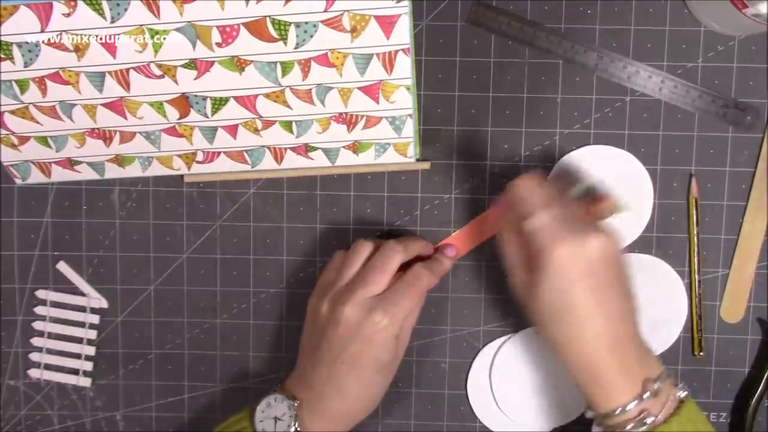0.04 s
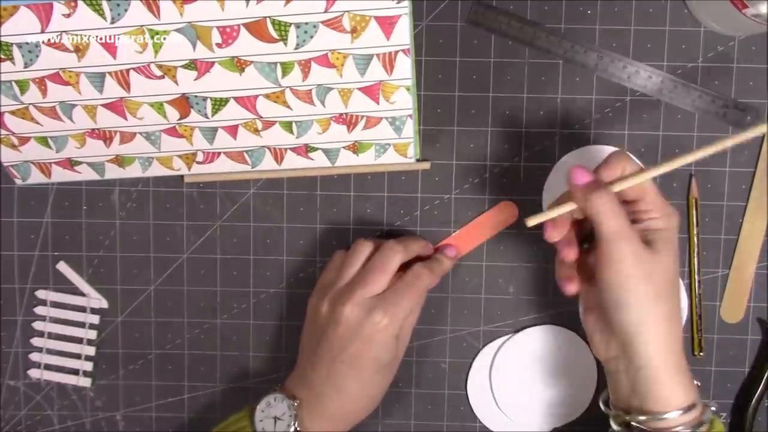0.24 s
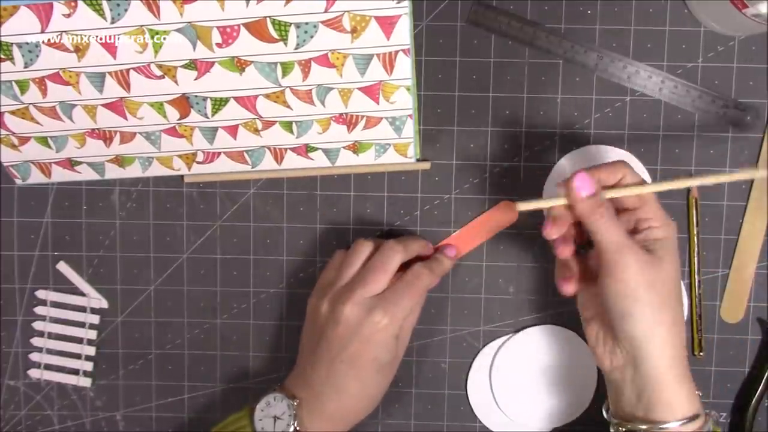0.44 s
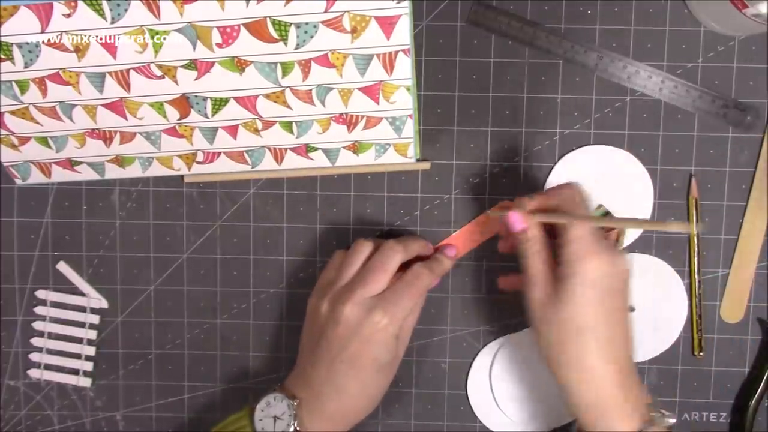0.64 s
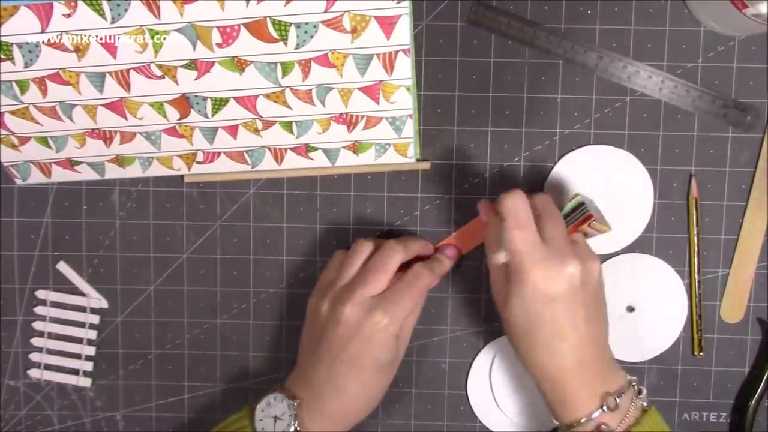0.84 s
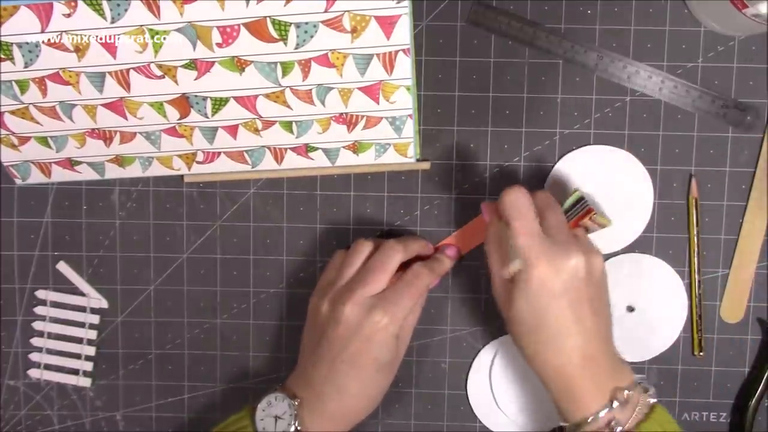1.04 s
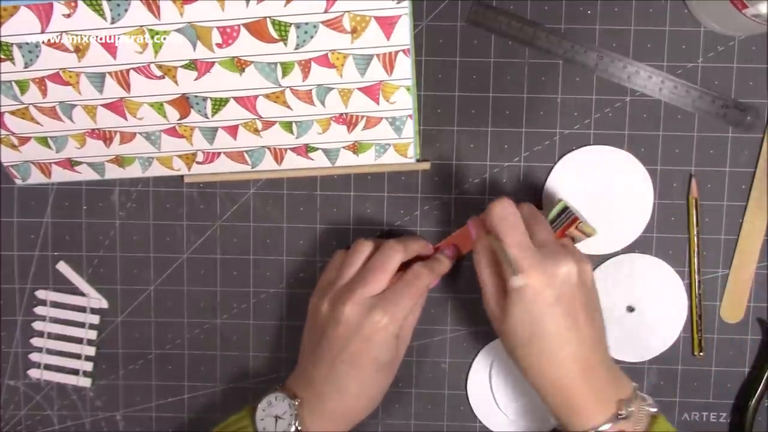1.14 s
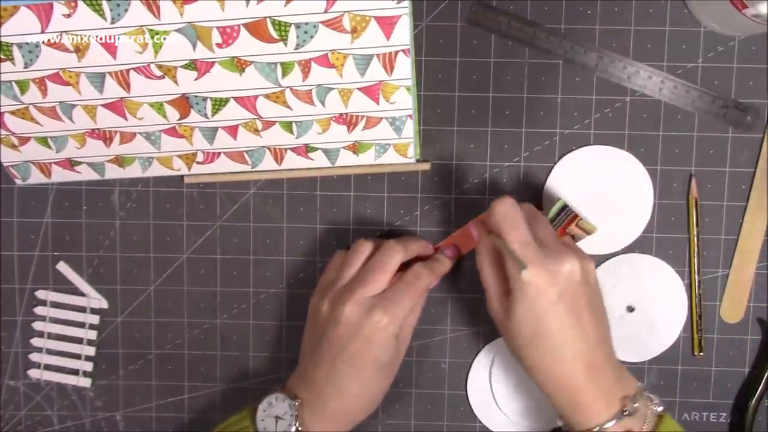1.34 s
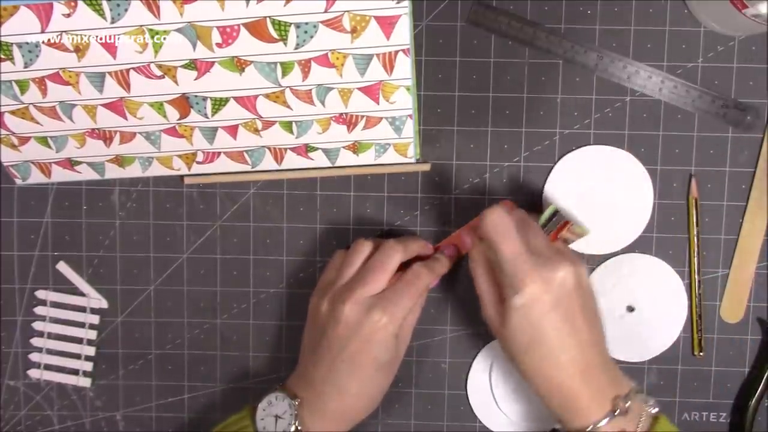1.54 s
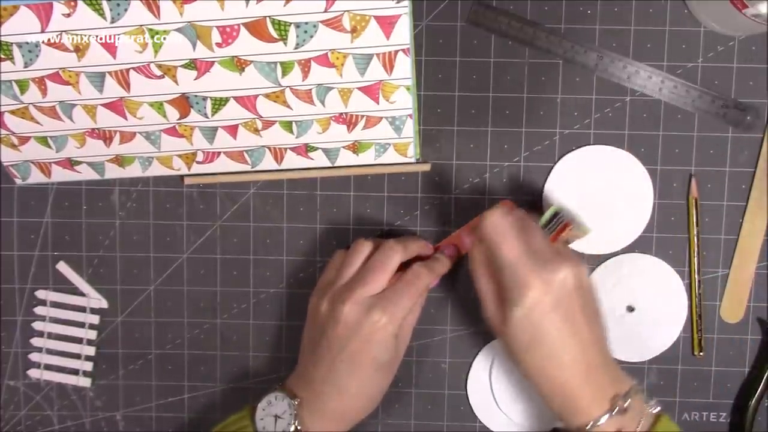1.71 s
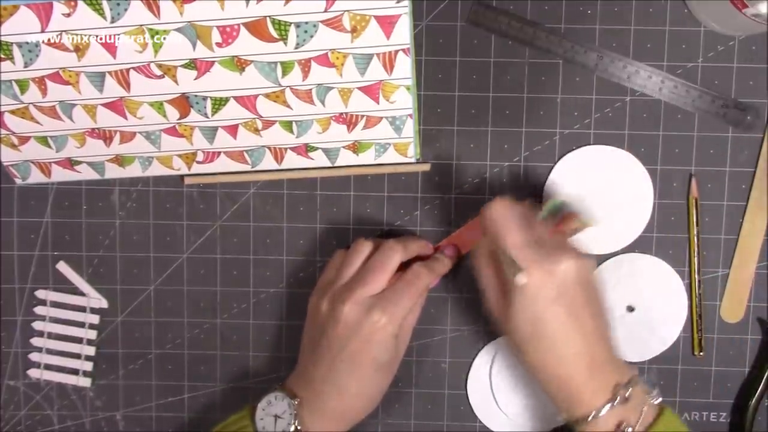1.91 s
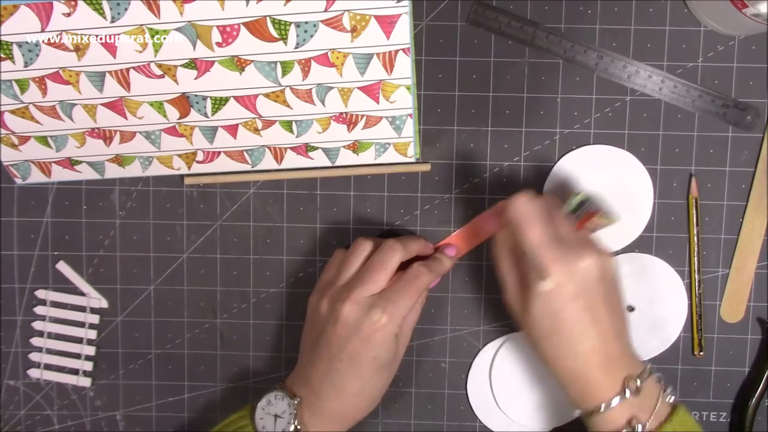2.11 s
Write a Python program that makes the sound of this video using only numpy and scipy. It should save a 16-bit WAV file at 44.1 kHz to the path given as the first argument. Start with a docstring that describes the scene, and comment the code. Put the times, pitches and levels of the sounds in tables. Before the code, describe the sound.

A nail file rasps on the end of a wooden dowel, heard close in a small room. A stroke ends with a woody tap at 0 s, and a bracelet clinks at 0.1. Faint finger brushes fill the pause until a soft knock near 0.66. Short hesitant scrapes follow, then from 1.0 steady gritty strokes, about eleven a second, alternate hollow and duller, growing stronger, with bright bangle clinks over quiet room noise.

```python
"""Filing the end of a wooden dowel

A nail file rasps across the cut end of a dowel, about eleven strokes a second, close by in a small room.
Noise grains of grit hiss and ring file and dowel: pushes ring hollow, pulls are duller and rub more in the hands.
In one pause the fingers brush the dowel as they turn it and set it back on the file with a knock of struck modes.
Bracelets clink on the working wrist: short bright noise and decaying modes. Behind it all is a quiet noise floor."""
import sys
import numpy as np
from scipy import signal
from scipy.fft import rfft, irfft
from scipy.io import wavfile

SR = 44100
rng = np.random.default_rng(int(sys.argv[2]) if len(sys.argv) > 2 else 0)


def wav_record(signal):
    """Record a signal, one row per channel, as 16-bit PCM in the file named by sys.argv[1]."""
    frames = np.transpose(np.atleast_2d(signal))
    bounded = np.clip(frames, -1, 1)
    # unit amplitude maps onto the largest positive 16-bit level
    quanta = np.round(bounded * 32767).astype(np.int16)
    wavfile.write(sys.argv[1], SR, quanta)


N = 95564
T = np.arange(N) / SR


def amp(db):
    """Decibels to gain."""
    return 10 ** (np.asarray(db) / 20)


def unit(x):
    """Scales to rms 1."""
    return x / np.sqrt(np.mean(x ** 2) + 1e-20)


def read(points, hz):
    """Reads a table on a log-frequency axis."""
    f, value = np.transpose(points)
    return np.interp(np.log(hz + 1), np.log(f + 1), value)


def colour(x, points, size=4096):
    """Causal minimum-phase filter with the given spectrum that keeps the power of white noise."""
    log_gain = np.log(amp(read(points, abs(np.fft.fftfreq(size, 1 / SR)))))
    spectrum = np.exp(np.conj(signal.hilbert(log_gain)))
    taps = np.fft.ifft(spectrum).real[:size // 2]
    return signal.fftconvolve(x, taps / np.linalg.norm(taps))[:N]


def resonate(x, hz, width_hz):
    """A resonance of gain 1 at a fixed or moving pitch: shift to 0 Hz, smooth, shift back."""
    turn = np.exp(2j * np.pi * np.cumsum(hz * np.ones(len(x))) / SR)
    r = np.exp(-np.pi * width_hz / SR)
    smooth = signal.lfilter([1 - r], [1, -r], x / turn + 1e-18)
    return 2 * (turn * smooth).real


def resonate_twice(x, hz, width_hz):
    """Two equal resonances in a row, for steeper skirts."""
    return resonate(resonate(x, hz, width_hz), hz, width_hz)


def add(mix, start_s, sound):
    """Adds a sound to the mix at a time."""
    part = mix[round(start_s * SR):][:len(sound)]
    part += sound[:len(part)]


def ring(hz, t60_s, rise_s):
    """One struck mode: a sine with a soft onset and an exponential decay."""
    t = T[:SR // 5]
    decay = np.exp(-np.log(1000) * t / t60_s)
    return (1 - np.exp(-t / rise_s)) * decay * np.sin(2 * np.pi * (hz * t + rng.random()))


def filing():
    """Strokes drive grit hiss, a rasp, the ring of the wood and a low rub through the hands; the file snags."""
    # strokes of the file, low-ringing pushes and higher-ringing pulls, mostly in turn from 1.1 s on:
    # start_s, length_s, grit_db, wood_ring_db, wood_pitch_hz, low_rub_db
    strokes = [(-.05, 0.065, -35.5, -40.5, 1460, -50.5), (.720, 0.067, -45.5, -40.5, 1290, -55.5),
               (.746, 0.017, -80, -36.5, 1390, -51), (.824, 0.027, -39, -40, 1790, -50.5),
               (.849, 0.024, -48.5, -49.5, 1685, -57), (.929, 0.031, -42, -34, 1390, -50.5),
               (1.009, 0.072, -38.5, -35, 1650, -46), (1.111, 0.055, -38.5, -35, 1370, -49.5),
               (1.213, .052, -33.5, -38.5, 1690, -42.5), (1.303, 0.047, -37, -36.5, 1290, -51),
               (1.397, 0.061, -35.5, -36, 1695, -41.5), (1.489, 0.066, -34.5, -27.5, 1270, -48.5),
               (1.587, 0.068, -36, -41, 1770, -43), (1.675, 0.062, -33.5, -28, 1336, -45.5),
               (1.767, 0.068, -35, -41, 1950, -45), (1.857, 0.062, -33, -29.5, 1480, -45),
               (1.950, 0.054, -33.5, -47, 1890, -40), (2.038, 0.061, -35, -30.5, 1560, -43.5),
               (2.12, 0.056, -35, -39, 1630, -43)]
    # the file snags on a fibre: start_s, wood_ring_db
    snags = [(0.749, -34.5), (1.236, -35.5), (1.43, -31.5), (1.803, -24), (1.895, -41.5)]
    # colour of the grit hiss: frequency_hz, level_db
    grit_colour = [(150, -66.5), (700, -3.5), (1500, 11), (2700, 4), (3300, 0.5), (4500, 1.5), (5200, -2.5),
                   (7000, -2.5), (9500, -4.5), (12000, -10), (13500, -17.5), (15700, -23)]
    # colour of the low rub in the hands: frequency_hz, level_db
    rub_colour = [(30, -82), (100, -17), (140, -8.5), (210, 1.5), (310, 0), (380, -2.5), (520, 4.5),
                  (650, -3), (850, 1), (1300, -20), (4000, -30.5)]
    push_below_hz = 1690  # a push rings lower than a pull
    push_glide, pull_glide = -0.23, 0.18  # octaves in one stroke, as the free length changes
    push_late, pull_late, grit_late, rasp_late = 0.77, 0.99, 0.66, 0.95  # below 1: loudest early, then trails off
    grit_arch, wood_arch, rub_arch = 0.56, 1, 0.15  # how steeply each layer follows the speed of the stroke
    wood_overrun_s, rub_overrun_s = 0.0061, 0.0075  # ring and rub outlast the bite of the grit
    rasp_hz, rasp_width_hz, rasp_db = 2634, 1100, -7  # upper resonance of the file, level against grit and ring
    wood_width_hz = 910
    snag_s, snag_grit_db = 0.0015, -11.5  # time to the peak, grit level against the ring
    catch_s, catch_db = 0.002, 1.8  # smoothing time and rms swing of the uneven bite

    grit, rasp, wood, rub = np.zeros((4, N))
    pitch = np.full(N, float(strokes[0][4]))
    for start, length, grit_db, wood_db, hz, rub_db in strokes:
        glide, late = (push_glide, push_late) if hz < push_below_hz else (pull_glide, pull_late)
        grit += amp(grit_db) * speed(start, length, grit_late) ** grit_arch
        rasp += amp((wood_db + grit_db) / 2 + rasp_db) * speed(start, length, rasp_late) ** grit_arch
        wood += amp(wood_db) * speed(start, length + wood_overrun_s, late) ** wood_arch
        rub += amp(rub_db) * speed(start, length + rub_overrun_s) ** rub_arch
        progress = np.clip((T - start) / length, 0, 1)
        pitch = np.where(T >= start, hz * 2 ** (glide * (progress - .5)), pitch)
    for start, db in snags:
        u = np.maximum(T - start, 0) / snag_s
        jolt = amp(db) * (u * np.exp(1 - u)) ** 2
        wood += jolt
        grit += amp(snag_grit_db) * jolt

    wander = signal.fftconvolve(rng.standard_normal(N), np.exp(-T / catch_s))[:N]
    catch = unit(amp(catch_db * unit(wander)))
    hiss = colour(grit * catch * grains(), grit_colour)
    low_rub = colour(rub * grains(), rub_colour)
    hollow = wood_ring(wood * catch * grains(), pitch, wood_width_hz)
    bright = wood_ring(rasp * catch * grains(), rasp_hz, rasp_width_hz)
    return hiss + low_rub + hollow + bright


def speed(start_s, length_s, late=1):
    """The hand speeds up and slows down in half a sine, leaning late above 1 and early below."""
    arch = np.sin(np.pi * np.clip((T - start_s) / length_s, 0, 1) ** late).clip(0)
    return arch * (T < start_s + length_s)


def grains():
    """Dense tiny clicks of uneven size: grit tearing fibres."""
    per_s, spread_db = 6500, 2.2
    size = amp(spread_db * np.minimum(rng.exponential(1, N), 4))
    return unit(size * rng.choice([-1., 1.], N) * (rng.random(N) < per_s / SR))


def wood_ring(drive, hz, width_hz):
    """A broad resonance feeds the narrow modes of file and dowel, too small to radiate bass."""
    # modes of file and dowel: frequency_hz, width_hz, level_db
    body_modes = [(525, 20, 7), (880, 30, -2), (958, 25, -1), (1107, 26, 10), (1279, 22, 0), (1341, 25, 0),
                  (1615, 50, 1), (1761, 30, 0), (1830, 25, 1), (1925, 35, -2), (2188, 35, -3),
                  (2470, 60, 0), (2590, 30, 3)]
    broad_db, lowest_hz = -3.5, 383
    broad = resonate_twice(drive, hz, width_hz)
    body = amp(broad_db) * broad
    for mode_hz, mode_width_hz, db in body_modes:
        body += amp(db) * resonate(broad, mode_hz, mode_width_hz)
    no_bass = signal.butter(2, lowest_hz, "high", fs=SR, output="sos")
    return unit(signal.sosfilt(no_bass, body)) * np.std(drive)


def knocks():
    """The dowel meets the file with a round woody tap and a small tick, both sums of struck modes."""
    # the dowel knocks on the file: start_s, wood_db, tick_db (of each mode)
    touches = [(.003, -29.5, -26.5), (0.663, -42.5, -44.5), (0.923, -34.5, -49)]
    # modes of the woody tap: frequency_hz, t60_s
    tap_modes = [(1150, 0.02), (1380, 0.03), (1590, 0.02)]
    # modes of the tick: frequency_hz, t60_s
    tick_modes = [(8300, 0.017), (8700, 0.0062), (9300, 0.0097)]
    out = np.zeros(N)
    for start, wood_db, tick_db in touches:
        for modes, db in ((tap_modes, wood_db), (tick_modes, tick_db)):
            add(out, start, amp(db) * sum(ring(hz, t60, rise_s=0.0015) for hz, t60 in modes))
    return out


def bracelets():
    """Two bangles knock together: a brief bright chatter and a few modes, never struck quite alike."""
    # bracelet clinks: start_s, first_bangle_db, second_bangle_db
    clinks = [(.102, -51, -51), (.110, -36, -56), (.496, -62, -58), (.593, -44, -60), (.928, -33, -43),
              (.946, -39, -33), (.975, -56, -44), (1.136, -35, -52), (1.169, -43, -40), (1.196, -44, -44),
              (1.322, -35, -50), (1.339, -36, -50), (1.366, -39, -37), (1.548, -39, -43), (1.690, -33, -43),
              (1.890, -35, -46), (1.942, -48, -48), (2.062, -35, -47)]
    # modes of the first bangle: frequency_hz, level_db, t60_s
    first_bangle = [(5660, 0, .06), (8190, -1, .042), (12480, -5, .032)]
    # modes of the second bangle: frequency_hz, level_db, t60_s
    second_bangle = [(3525, -1, .04), (7420, -7, .03), (8850, -8, .03), (9950, -2, .045)]
    spread_db, detune, rise_s = 2, 0.002, 0.0004  # rms level spread, rms relative detuning, onset
    chatter_hz, chatter_db, chatter_s = 7340, -8, 0.003  # level against the louder bangle, decay time
    after_db, after_t60_s = -18, 0.1  # the bangles ring on faintly
    out, t = np.zeros(N), T[:SR // 5]
    for start, first_db, second_db in clinks:
        # as wide as its pitch is high
        chatter = unit(resonate_twice(rng.standard_normal(len(t)), chatter_hz, chatter_hz))
        add(out, start, amp(max(first_db, second_db) + chatter_db) * np.exp(-t / chatter_s) * chatter)
        for modes, level_db in ((first_bangle, first_db), (second_bangle, second_db)):
            for hz, db, t60 in modes:
                louder, sharper = rng.standard_normal(2)
                strike = ring(hz * (1 + detune * sharper), t60, rise_s)
                add(out, start, amp(level_db + db + spread_db * louder) * strike)
                add(out, start, amp(level_db + db + after_db) * ring(hz, after_t60_s, rise_s))
    return out


def fingers():
    """Skin brushes the dowel as it is turned: soft swells of grains through a wide resonance."""
    # fingers slide on the dowel: middle_s, half_length_s, level_db, brightest_hz
    brushes = [(.092, .008, -70, 9100), (0.243, 0.0067, -59, 6900), (0.378, 0.015, -63, 10200),
               (.485, 0.0073, -62.5, 7650)]
    out = np.zeros(N)
    for middle, half, db, hz in brushes:
        swell = np.exp(-((T - middle) / half) ** 2)
        out += amp(db) * swell * unit(resonate_twice(grains(), hz, width_hz=4000))
    return out


def room(x):
    """Quick reflections off the table, then a short tail of decaying noise, strongest in the bass."""
    # decay of the room: frequency_hz, t60_s
    decay_times = [(150, 0.23), (800, 0.23), (14000, 0.15)]
    early_db, early_s, tail_db = -9, 0.0033, -12.5  # early_s: decay time of the reflections
    low_db, high_db = 5.5, 1  # tilt of the tail
    t = T[:SR // 2]
    taps = rng.standard_normal((2, len(t))) * (rng.random((2, len(t))) < .1)  # sparse reflections
    early = taps[0] * (t > .001) * np.exp(-t / early_s)
    hz, at, z = signal.stft(taps[1] * (t > .006), SR, nperseg=256)
    z = z * np.exp(-np.log(1000) * at / read(decay_times, hz)[:, None])
    tail = signal.istft(z, SR, nperseg=256)[1][:len(t)]
    tilt_points = [(300, low_db), (1500, 0.021), (8000, high_db)]
    tilt = amp(read(tilt_points, np.fft.rfftfreq(len(t), 1 / SR)))
    tail = irfft(rfft(tail / np.linalg.norm(tail)) * tilt, len(t))
    response = amp(early_db) * early / np.linalg.norm(early) + amp(tail_db) * tail
    return x + signal.fftconvolve(x, response)[:N]


def background():
    """The quiet behind the work: steady coloured noise and a faint hum of narrow-band noise."""
    # colour of the background: frequency_hz, level_db
    floor_colour = [(20, -14), (75, -14.5), (215, 0.5), (686, -4), (1310, -7.5), (10000, -22.5),
                    (15600, -43)]
    floor_db, hum_db = -61.5, -68
    floor = colour(rng.standard_normal(N), floor_colour)
    hum = unit(resonate(rng.standard_normal(N), hz=845, width_hz=60))
    return amp(floor_db) * floor + amp(hum_db) * hum


def scene():
    """Filing, knocks, bracelets and fingers in the room, over its quiet background."""
    close_by = filing() + knocks() + bracelets() + fingers()
    return (room(close_by) + background())[None]


def record(dry):
    """The band limit of the recorder: a steep low-pass."""
    edge_hz = 15750
    low_pass = signal.firwin(1023, edge_hz, window=("kaiser", 9), fs=SR)
    return signal.oaconvolve(dry, low_pass[None], "same")


dry = scene()
out = record(dry)
wav_record(out)
```